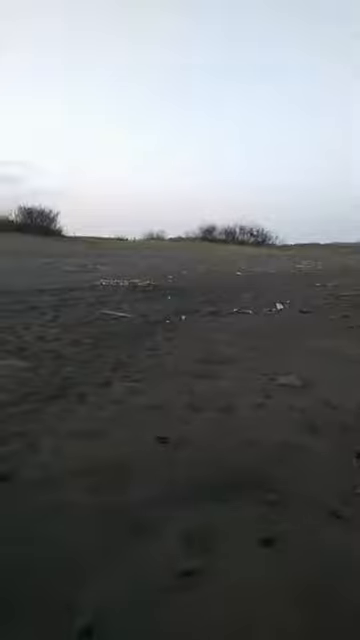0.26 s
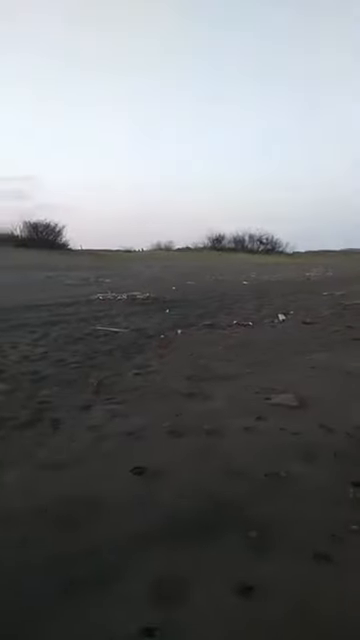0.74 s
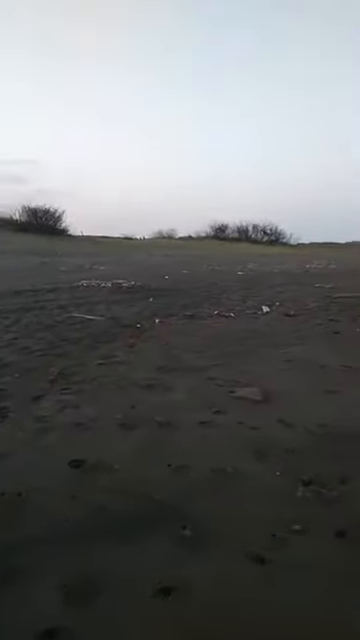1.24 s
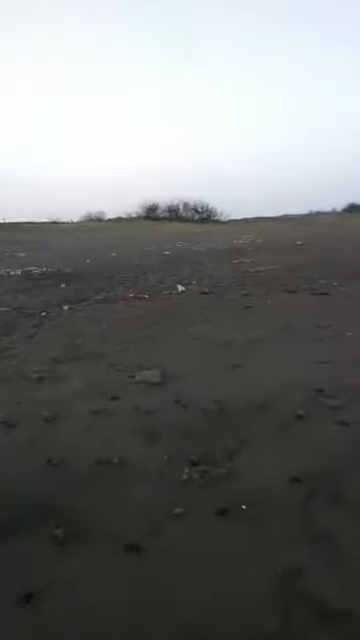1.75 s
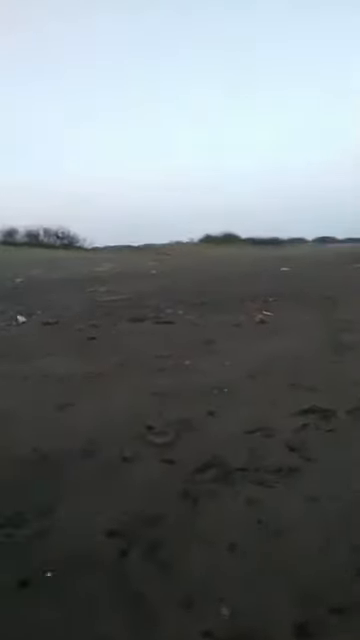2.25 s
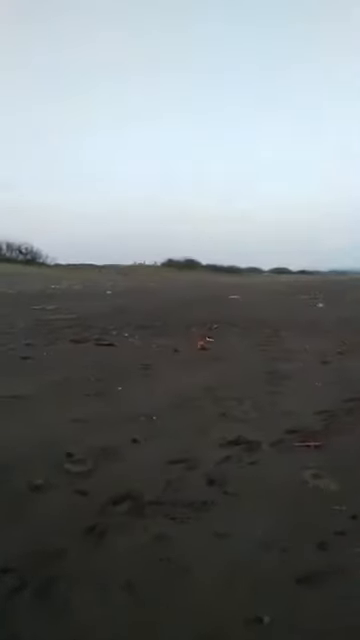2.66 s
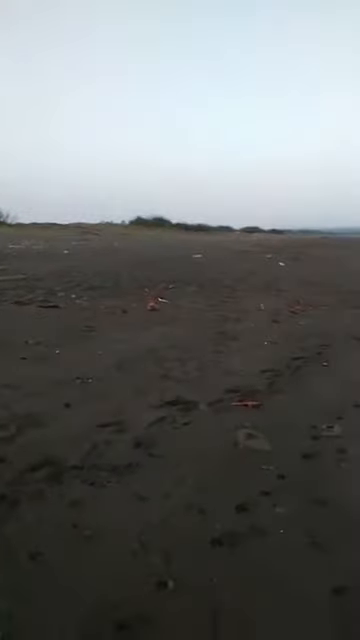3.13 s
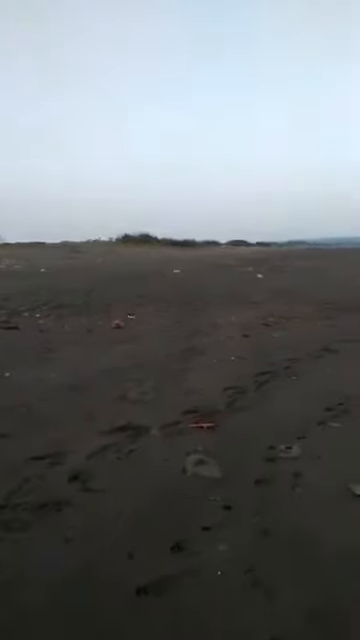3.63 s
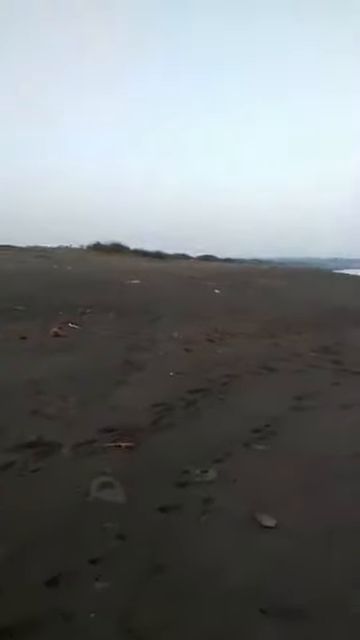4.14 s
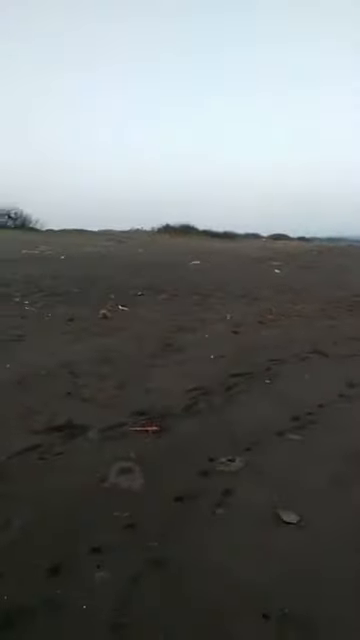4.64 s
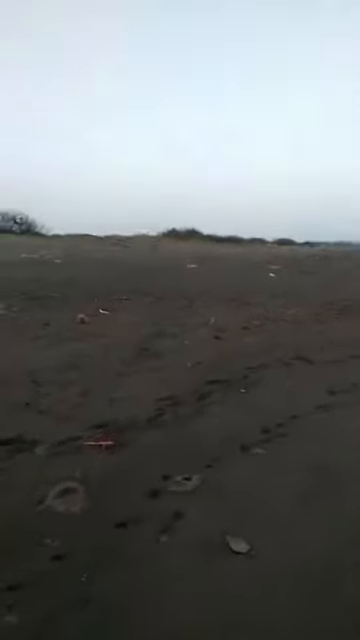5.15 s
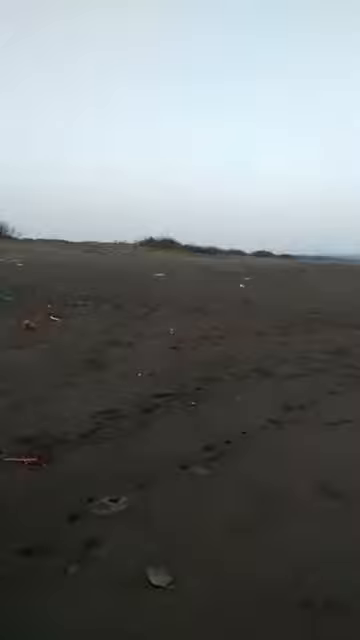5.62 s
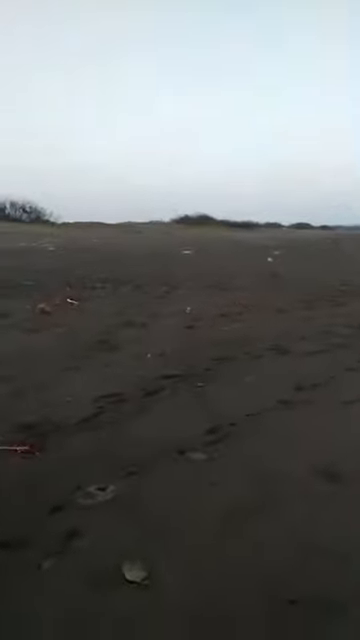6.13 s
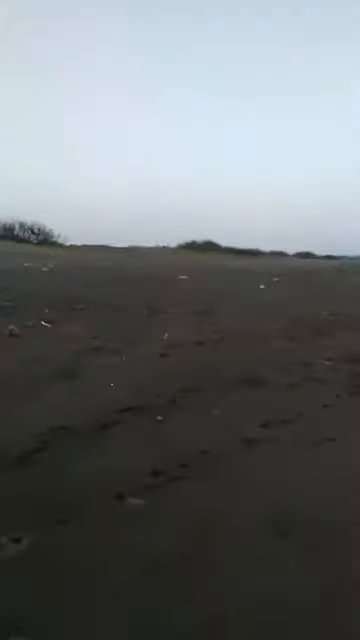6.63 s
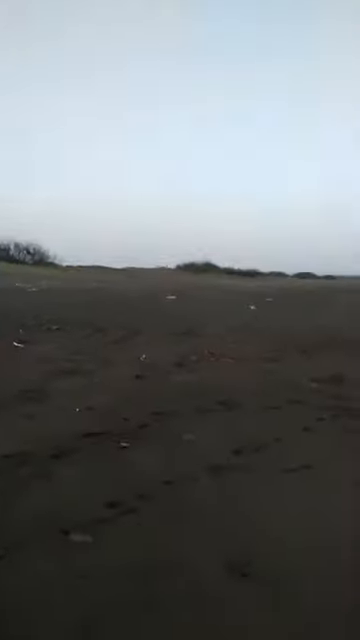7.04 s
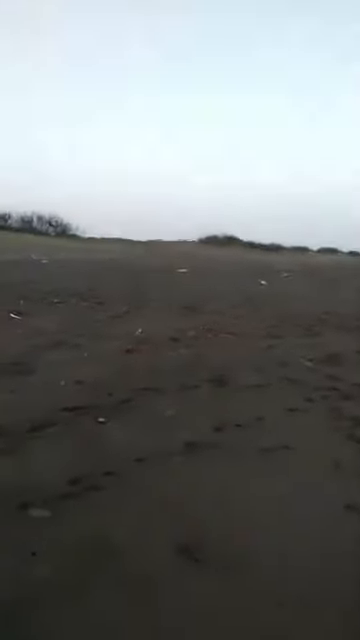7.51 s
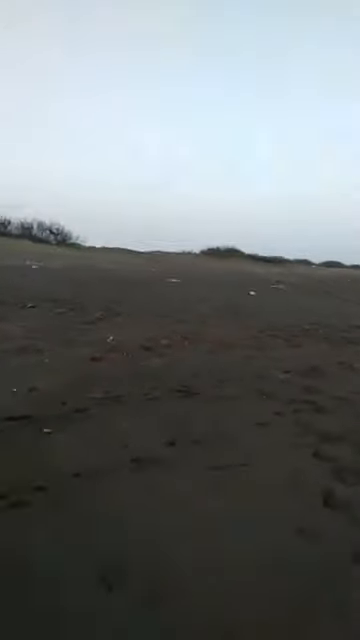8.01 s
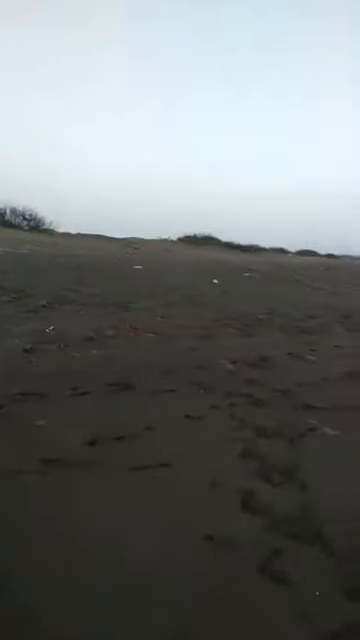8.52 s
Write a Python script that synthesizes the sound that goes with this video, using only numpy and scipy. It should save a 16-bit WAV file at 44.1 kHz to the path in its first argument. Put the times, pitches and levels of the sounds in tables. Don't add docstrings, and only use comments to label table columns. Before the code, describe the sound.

Wind buffets a hand-held microphone while a small bird chirps twice, then breaking waves rise into a broad, foamy rush.

```python
import sys
import numpy as np
from scipy import signal
from scipy.fft import irfft
from scipy.io import wavfile
from scipy.ndimage import uniform_filter1d

SR = 44100
rng = np.random.default_rng(int(sys.argv[2]) if len(sys.argv) > 2 else 0)


def store_pcm(level_fs):
    pcm = np.round(np.clip(level_fs, -1, 1) * 32767).astype(np.int16)
    wavfile.write(sys.argv[1], SR, np.atleast_2d(pcm).T)


def level_to_linear(level):
    exponent = np.asarray(level, float) / 20
    return 10 ** exponent


N = 386757
T = np.arange(N) / SR
FRAME, HOP = 1024, 256


def level(x, db):
    return x * level_to_linear(db) / np.sqrt(np.mean(x ** 2))


def band(x, lo_hz, hi_hz, order=2):
    return signal.sosfilt(signal.butter(order, [lo_hz, hi_hz], "band", fs=SR, output="sos"), x)


def colour(table, hz):
    points = np.array(table, float)
    return np.interp(np.log(hz + 1), np.log(points[:, 0]), points[:, 1])


def shaped(x, gain_db):
    hz, s, z = signal.stft(x, SR, nperseg=FRAME, noverlap=FRAME - HOP)
    z = z * level_to_linear(gain_db(hz[:, None], s))
    return signal.istft(z, SR, nperseg=FRAME, noverlap=FRAME - HOP)[1][:N]


def patches(hz, s, width_hz, hold_s):
    wide = max(int(width_hz * FRAME / SR), 1)
    long = max(int(hold_s * SR / HOP), 1)
    field = rng.standard_normal((len(hz) // wide + 1, len(s)))
    field = np.repeat(field, wide, axis=0)[:len(hz)]
    field = uniform_filter1d(field, long, axis=1)
    field = uniform_filter1d(field, long // 2 + 1, axis=1)
    return field / field.std()


# start_s, level_db (over the wash)
SLAPS = [(.906, 3), (1.066, 3), (1.6272, 8), (1.6443, 4), (1.770, 5), (2.4777, 2), (2.5988, 7), (2.9946, 2),
         (3.3086, 2), (3.3651, 3), (3.8115, 4), (4.3034, 3), (4.4656, 2), (4.4778, 3), (5.1305, 2),
         (5.232, 2), (6.2476, 2), (6.3531, 2), (6.7185, 4), (7.1864, 5), (7.2064, 4), (7.3363, 3),
         (7.6203, 8), (7.6792, 2), (7.7544, 2), (8.0114, 3), (8.7348, 2)]


def surf():
    rise_s, fall_s = .0006, .0016
    burst_size = np.repeat(rng.exponential(size=N // 64 + 1), 64)[:N]
    bubbles = rng.standard_normal(N) * level_to_linear(0.44 * burst_size)
    crest = sum(level_to_linear(db) * np.exp(-np.maximum((s - T) / rise_s, (T - s) / fall_s)) for s, db in SLAPS)
    slaps = 1.5 * band(np.sign(rng.standard_normal(N)) * crest, 6200, 16000)
    wash = shaped(bubbles + slaps + level_to_linear(-8) * looped(), surf_gain)
    full_surf = wash[int(3.3 * SR):int(4.2 * SR)]
    return wash * level_to_linear(-35.5) / full_surf.std()


# hz, level_db (per
# Hz)
SURF = [(35, -48), (60, -19.5), (262, -2.5), (422, -2.5), (695, -3.5), (882, -3), (2040, -2), (2450, -2),
        (2950, -4.5), (5740, -7.5), (7000, -4),
        (7700, -1.5), (8700, 4), (9950, -1.5), (10050, -6), (12760, -14.5), (12840, -20.5), (14100, -17),
        (15730, -17.5), (15860, -84)]
# start_s, notch_hz, depth_db
SAND = [(0, 736, 1), (1.7, 850, 3), (1.85, 760, 9), (1.95, 850, 5), (2.03, 960, 11), (2.15, 900, 4),
        (3.9, 690, 3), (4.3, 660, 8), (5.2, 730, 7), (5.55, 820, 4), (5.9, 920, 8), (6.15, 950, 6),
        (6.33, 1000, 13), (6.75, 1050, 14), (6.9, 1070, 18), (7.15, 1060, 17), (7.35, 1150, 11),
        (7.42, 1150, 1.5), (8.77, 1010, 2)]
# centre_hz, width_hz, extra_share (of the sinking)
FIRST_SHUT = [(1560, 150, -.5), (1830, 80, .25), (2150, 250, -.15), (2780, 120, .4), (4320, 90, 1.2),
              (6550, 130, 1.8), (7250, 130, 1.3), (9200, 500, .2), (10700, 500, .7), (13500, 400, .4)]


def surf_gain(hz, s):
    at, notch_hz, depth_db = np.transpose(SAND)
    depth_db = np.interp(s, at, depth_db) + 1.8 * patches(hz, s, 30000, .06)
    notch_width = 0.1 + 0.003 * depth_db
    from_notch = np.log((hz + 1) / np.interp(s, at, notch_hz))
    notch_db = -depth_db * np.exp(-(from_notch / notch_width) ** 2)
    weak = sum(share * np.exp(-((hz - f) / width) ** 2) for f, width, share in FIRST_SHUT)
    swell_db = swell(hz, s)
    sunk_db = swell_db + weak * np.clip(swell_db, -9, 0) + notch_db
    splash_db = 0.69 * patches(hz, s, 30000, .025) * np.clip(hz / 9000, 0, 1.6)
    splash_db = splash_db + 0.45 * patches(hz, s, 1460, .03)
    ripple_db = np.clip(.9 - sunk_db / 8, .9, 2) * patches(hz, s, 90, 0.15)
    gain_db = colour(SURF, hz) + holes(hz, s) + surges(hz, s)
    return gain_db + sunk_db + splash_db + ripple_db + suppressor(hz, s, sunk_db)


# start_s, roar_db (re full surf), reach_octaves (how far down the roar goes under reach_top_hz)
ROAR = [(0, -11.5, 0.17), (.12, -12, 0.17), (.27, -15.5, 0.12), (.5, -16, 0.064), (.885, -14, 0.08),
        (.91, -18.5, 0.32), (1.0, -15, 0.22), (1.1, -12.5, 0.48), (1.32, -11, 0.51), (1.36, -11, .3),
        (1.41, -12.5, 0.77), (1.545, -10.5, 0.71), (1.59, -9.5, 1.9), (1.85, -6, 1.7), (2.07, -1, 1.73),
        (2.3, -4.5, 1.83), (2.38, -2.5, 0.41), (2.54, -1, 1.13), (2.6, 0, 2.05), (3.9, 3.5, 2.88),
        (4.35, 2, 2.96), (5.5, 2.5, 3.08), (6.9, -3, 1.88), (6.99, -6.5, 1.7), (7.05, -5, 1.2),
        (7.16, -7.5, 0.97), (7.21, -5.5, 0.5), (7.32, -3, 0.28), (7.38, -2.5, 0.55), (7.42, -2, 1.6),
        (7.55, -1, 1.8), (7.8, -1, 2.05), (8.77, 1, 2.13)]
# start_s, level_db (re full surf), grip_db (suppressor on the weaker treble)
FOAM = [(0, -3, 13.5), (.06, -2.5, 17), (.1, -4.5, 7.5), (.2, -1, 11.5), (.3, -6.5, 10), (.4, -8, 16),
        (.62, 0, 17.5), (.75, -3.5, 11), (.88, -3, 12.5), (1.0, -9.5, 3.5), (1.14, -9.5, 10.5),
        (1.32, -9, 22), (1.42, -4.5, 3.5), (1.58, -2.5, 2), (1.65, -1.5, 0), (1.899, -0.5, 1),
        (2.02, 0.5, 2.5), (2.2, -2, 1.5), (2.82, -5.5, 2.5), (2.95, 0, 2.5), (5.4, -1.5, 0), (5.7, -3, 1.5),
        (6.15, -6, 0), (6.65, -1.5, 4), (6.9, 1.5, 4), (7.15, -0.5, 3), (7.25, 0, -1.1), (7.6, 3.5, -0.5),
        (8.1, -1, -0.5), (8.77, -1, 0.5)]
# start_s, level_db, settle_s
SPRAY = [
    (1.06, 2.5, 0.14),
    (1.43, 0, 0.055),
    (1.62, 3, 0.094),
    (2.47, 5, 0.36),
    (2.58, 3.5, 0.051),
    (3.46, 1.5, 0.29),
    (6.22, 4, 0.036),
    (7.17, 3.5, 0.048),
    (7.43, -0.5, 0.07),
    (7.61, 2, 0.036),
]
# start_s, centre_hz, length_s, level_db (re full surf)
BOOMS = [(1.033, 566, 0.11, -7), (1.216, 387, 0.043, 0.5), (0.098, 1330, 0.03, -12),
         (0.927, 1240, .04, -20), (1.574, 326, 0.044, -12.5), (1.964, 267, 0.089, 1),
         (2.032, 380, 0.059, 3), (2.447, 474, 0.15, -10), (2.72, 302, 0.043, -2), (3.15, 236, 0.069, 12.5),
         (3.314, 246, 0.043, 11), (3.634, 245, 0.023, 11.5), (3.938, 247, 0.024, 15.5),
         (4.094, 220, 0.096, 6), (4.621, 245, 0.15, 14), (4.8, 220, 0.029, -1), (5.032, 242, 0.035, 10.5),
         (5.16, 230, 0.037, 13), (5.37, 263, 0.19, 5.5), (5.925, 256, 0.04, 10), (6.144, 277, 0.074, 3),
         (6.59, 266, 0.11, -4), (6.868, 403, 0.07, -5), (7.126, 590, 0.035, -7), (7.257, 760, 0.027, -12),
         (7.522, 447, 0.033, 3), (7.633, 243, 0.054, 2.5), (7.89, 245, 0.13, 8.5), (8.2, 270, 0.12, 4.5),
         (8.51, 233, 0.082, 5.5)]
# hz, foam_share (against roar, 0-1), swell_depth, grip_share (of the suppressor)
FOLLOW = [(490, 0, 0.8, 0.079), (2360, 0.09, 0.88, 0.15), (2520, 0.25, 1.26, 0.61),
          (7160, 0.77, 0.74, 1.26), (8320, 0.76, 0.93, 0.057), (9700, 0.97, 0.81, 0.17),
          (12600, .97, 0.87, 0.79), (13000, .99, 0.6, 1.3), (14000, .99, .6, 1.1), (14500, 1, 0.81, 0.2)]


def swell(hz, s):
    spray_rise_s, reach_top_hz, boom_octaves = 0.016, 1620, 0.31
    under_db_per_oct, under_floor_db = 34.5, -21.5
    at, roar_db, reach = np.transpose(ROAR)
    foam_at, foam_db, grip_db = np.transpose(FOAM)
    foam, depth, grip = (colour(np.array(FOLLOW)[:, [0, k]], hz) for k in range(1, 4))
    foam = np.clip(foam, 0, 1)

    spray_db = sum(db * np.exp(-np.maximum((t - s) / spray_rise_s, (s - t) / settle_s))
                   for t, db, settle_s in SPRAY)
    bright_db = np.interp(s, foam_at, foam_db) + spray_db
    change_db = foam * bright_db + (1 - foam) * np.interp(s, at, roar_db)

    reach = np.interp(s, at, reach)
    ragged = .07 * patches(hz, s, 30000, 0.045) + .13 * patches(hz, s, 130, .06)
    edge = reach + ragged * np.clip(0.071 + reach, 0, 1)
    octaves = np.log2((hz + 1) / reach_top_hz)
    under_db = np.clip(under_db_per_oct * (octaves + edge), under_floor_db, 0)
    wash_db = depth * change_db - grip * np.interp(s, foam_at, grip_db) + under_db

    booms = 0
    for t, f, length_s, db in BOOMS:
        away = ((s - t) / length_s) ** 2 + (np.log2((hz + 1) / f) / boom_octaves) ** 2
        booms = booms + level_to_linear(2 * db) * np.exp(-away ** 2)
    booms = booms * level_to_linear(4.1 * patches(hz, s, 90, .025) - 6.0)
    return 10 * np.log10(level_to_linear(2 * wash_db) + booms)


# start_s, centre_hz, half_length_s, level_db
SURGES = [(.52, 220, .08, -5), (1.3, 160, .3, 4), (2.1, 110, .1, -7), (4.3, 220, .1, -8),
          (7.33, 150, 0.28, -7), (4.75, 80, 0.16, 8), (8.1, 88, .15, -6), (6.9, 90, .15, -1.5),
          (4.25, 60, .08, -5), (.7, 260, .08, 4), (1.04, 290, .1, 9), (1.6, 290, .2, 9),
          (2.4, 260, 0.18, -1), (2.97, 290, .1, 4), (6.5, 260, .2, 6), (6.9, 320, .1, -8),
          (6.7, 270, .1, -7), (8.3, 220, .1, -2), (11, 260, .06, 8), (.4, 450, 0.34, -8),
          (1.3, 420, .06, -4), (2.7, 610, 0.14, 5), (5.3, 370, 0.11, 4), (6.3, 400, 0.12, 1.5),
          (8.4, 410, 0.11, 5), (1, 680, 0.068, -4), (1.4, 950, 0.071, -3), (1.65, 740, 0.043, -13),
          (1.9, 750, 0.088, -10), (5.62, 870, .1, 3), (6, 560, 0.18, 10), (5.8, 890, 0.17, -14.5),
          (0.41, 1250, .12, -1), (.96, 1450, .06, 6.5), (1.12, 1100, .05, 0), (1.4, 980, 0.062, 2),
          (1.7, 950, 0.08, 5), (2.13, 1250, 0.3, 2), (5.4, 1300, 0.23, 3), (7.26, 1440, 0.31, -4.5),
          (0.5, 3300, 0.2, -6), (1.06, 3600, .2, 9.5), (1.56, 3200, 0.091, -1.5), (1.37, 2300, 0.05, -6),
          (1.75, 2150, 0.067, 5), (5.9, 11800, 0.38, 4), (7, 12300, 0.32, -5.5), (1.27, 10000, .15, 4),
          (2.55, 10800, 0.17, 2), (8.1, 17000, .3, 3)]


def surges(hz, s):
    t, f, half, db = np.array(SURGES).T[:, :, None]
    over_hz = np.exp(-(np.log2((hz + 1) / f.T) / 0.29) ** 2)
    over_time = db * np.exp(-((s - t) / half) ** 2)
    return over_hz @ over_time


def suppressor(hz, s, sunk_db, steep=4.4, leak=0.014):
    margin = np.clip(2.3 + sunk_db / 3.8, -1.2, 3)
    wander = np.clip(hz / 3500, .55, 1)
    wandering = margin + wander * patches(hz, s, 130, 0.05)
    passed = leak + 1 / (1 + np.exp(-steep * wandering))
    softened = margin / np.sqrt(1 + (steep * wander) ** 2 / 2.9)
    usual = leak + 1 / (1 + np.exp(-steep * softened))
    return 10 * np.log10(passed / usual)


# start_s, centre_hz, half_length_s
HOLES = [(.015, 2950, .015), (.22, 5550, .022), (.265, 2720, .018), (.41, 2760, .022), (.41, 450, .014),
         (.82, 2800, .04), (.83, 4050, .012), (.872, 4450, .018), (1.01, 7350, .018), (1.02, 5800, .022),
         (1.085, 4500, .02), (1.165, 4300, .022), (1.17, 2640, .02), (1.465, 3100, .022),
         (1.48, 6800, .016), (1.62, 3050, .025), (1.77, 2680, .018), (6.95, 1000, .035), (7.31, 1350, .035),
         (.47, 13400, .012), (.53, 13300, .02), (.6, 13250, .015), (.755, 13350, .028), (.84, 10900, .03),
         (5.78, 5200, .02), (6.8, 1060, .05), (7.09, 1150, .035), (1.68, 1670, .01), (2.97, 1050, .01)]


def holes(hz, s):
    gap_db = 0
    for t, f, half in HOLES:
        over_hz = np.exp(-((hz - f) / (f / 30 + 12)) ** 4)
        gap_db = gap_db - 33 * over_hz * np.exp(-((s - t) / half) ** 4)
    return gap_db


def looped():
    above_hz, loop_samples, cycles = 10050, 4704, 5
    bins = np.arange(loop_samples // 2 + 1)
    lines = rng.standard_normal((len(bins), 2)) @ [1, 1j]
    lines = lines * (bins % cycles == 0) * np.sqrt(cycles * loop_samples / 2)
    lines = lines * (bins * SR / loop_samples > above_hz)
    return np.resize(irfft(lines, loop_samples), N)


# start_s, thump_db, upper_rumble_db
GUSTS = [(0, -59, -66), (.08, -53, -65), (.1, -47, -59), (.15, -52, -62), (.19, -60, -61),
         (.24, -44.5, -64), (.28, -51, -58), (.334, -49, -67), (.392, -48.5, -61), (.42, -49, -57),
         (.46, -44.5, -69), (.5, -43.5, -67), (.55, -58, -66), (.585, -52, -84), (.615, -60, -80),
         (.69, -45.5, -57), (.725, -48, -52), (.758, -45, -49), (.795, -51, -63), (.85, -57, -62),
         (.9, -60, -70), (2.27, -65, -67), (2.65, -71.5, -69), (3.13, -63, -64), (3.35, -67, -65),
         (3.64, -59, -73), (3.76, -71, -61), (4.1, -80, -50), (4.42, -73, -69), (4.78, -66, -48.5),
         (4.93, -74, -67), (5.07, -55, -56), (5.2, -46.5, -49.5), (5.6, -76, -68), (5.69, -63, -68),
         (6.23, -62, -60), (7.21, -71, -78), (7.62, -70, -47), (7.79, -74, -52), (8.06, -62, -52.5),
         (8.35, -64, -70), (8.52, -86, -100)]


def wind():
    rise_db_s, fall_db_s = 396, 245
    flutter_db = 5.5 * level(band(rng.standard_normal(N), 0.79, 23, order=1), 0)
    gust_db, upper_db = -77 + flutter_db, -77.5 + flutter_db
    for s, db, high_db in GUSTS:
        away_db = np.maximum(rise_db_s * (s - T), fall_db_s * (T - s))
        gust_db = np.maximum(gust_db, db - away_db)
        upper_db = np.maximum(upper_db, high_db - away_db)
    thump = eddy(69.4, 108.0, order=2, even=0.42)
    upper = eddy(119.0, 182.5, order=3, even=0.93)
    coarse_s = T[::HOP]
    low_db, mid_db = surges(np.array([[85.], [150.]]), coarse_s)
    thump = thump * level_to_linear(gust_db + np.interp(T, coarse_s, low_db))
    return thump + upper * level_to_linear(upper_db + np.interp(T, coarse_s, mid_db))


def eddy(lo_hz, hi_hz, order, even):
    rumble = level(band(rng.standard_normal(N), lo_hz, hi_hz, order=order), 0)
    beating = np.sqrt(uniform_filter1d(rumble ** 2, size=700)) + .15
    return level(rumble / beating ** np.clip(even, 0, 1), 0)


# start_s, length_s, start_hz, end_hz, level_db
CHIRPS = [
    (.328, .024, 5050, 4450, -50),
    (.352, .022, 4250, 3850, -52),
    (.916, .024, 5350, 4500, -52),
    (.94, .018, 4350, 4000, -50),
]


def bird():
    call = np.zeros(N)
    shake_hz = 110 * level(band(rng.standard_normal(N), 60, 400), 0)
    for s, length, start_hz, end_hz, db in CHIRPS:
        u = np.clip((T - s) / length, 0, 1)
        pitch_hz = start_hz + (end_hz - start_hz) * u + shake_hz
        call += level_to_linear(db) * np.sin(np.pi * u) * np.sin(2 * np.pi * np.cumsum(pitch_hz) / SR)
    call *= 1 + .6 * level(band(rng.standard_normal(N), 50, 330), 0)
    tail_s = np.arange(int(.085 * SR)) / SR
    echo = rng.standard_normal(len(tail_s)) * np.exp(-tail_s / .05)
    return call + level_to_linear(-33) * signal.fftconvolve(call, echo)[:N]


# hz, level_db (per Hz)
HISS = [(30, -5), (200, 1), (1000, -9.5), (3000, -27), (7000, -17), (12000, 0.5), (13500, -24), (15700, 0),
        (15850, -68)]


def residue():
    def gain_db(hz, s):
        return colour(HISS, hz) + holes(hz, s) + 1.4 * patches(hz, s, 180, .05)
    return level(shaped(rng.standard_normal(N), gain_db), -70)


# start_s, half_length_s, level_db
PARTINGS = [
    (2.26, .035, -53),
    (3.32, .02, -68),
    (5.4, .03, -65),
    (6.03, .055, -53),
    (7.43, .025, -63),
]


def parting():
    hiss = level(band(rng.standard_normal(N), 5500, 12500, order=6), 0)
    return hiss * sum(level_to_linear(db) * np.exp(-((T - s) / half) ** 4) for s, half, db in PARTINGS)


def scene():
    middle = surf() + wind() + bird() + residue()
    return middle + np.array([[1], [-1]]) * parting()


def low_pass(x):
    return signal.sosfilt(signal.butter(12, 16850, fs=SR, output="sos"), x)


def record(dry):
    return low_pass(dry)


dry = scene()
out = record(dry)
store_pcm(out)
```